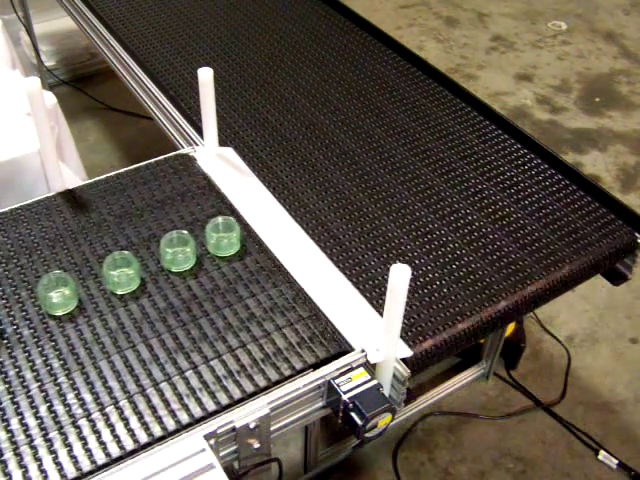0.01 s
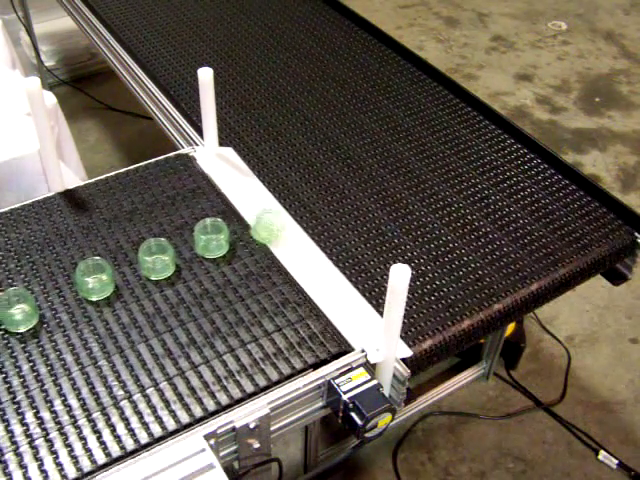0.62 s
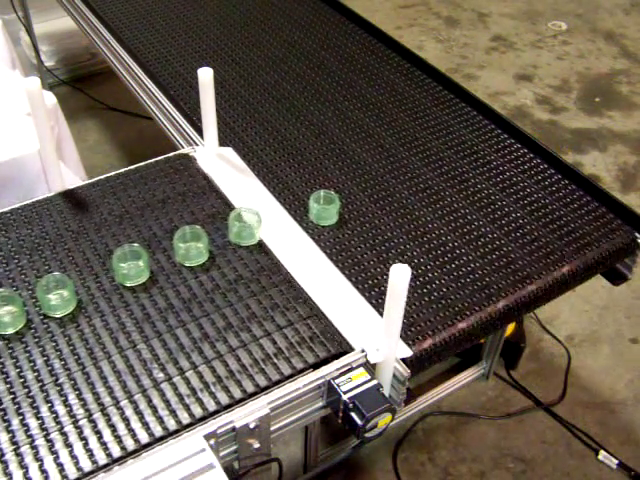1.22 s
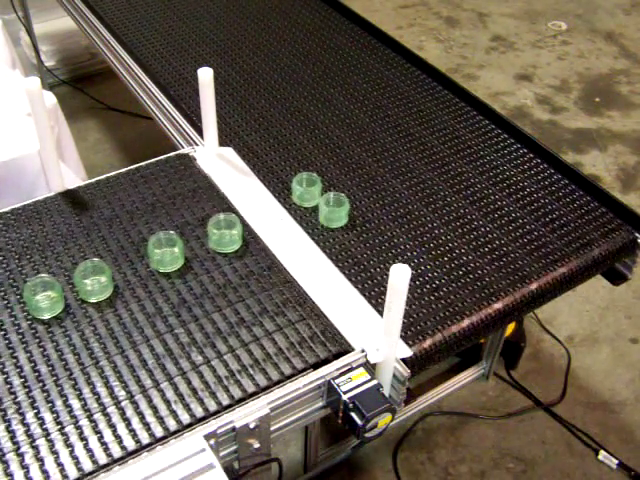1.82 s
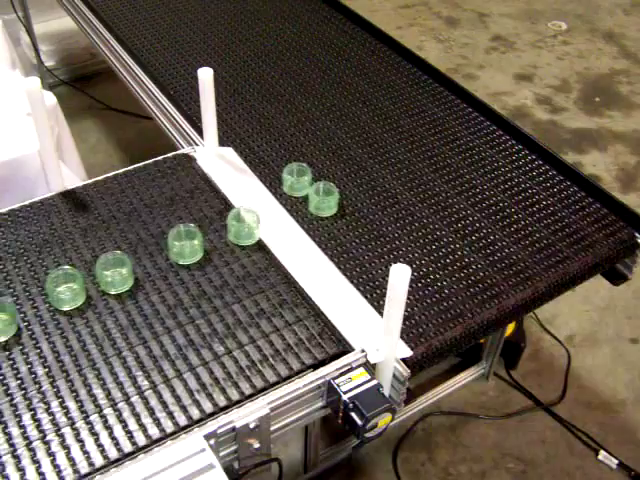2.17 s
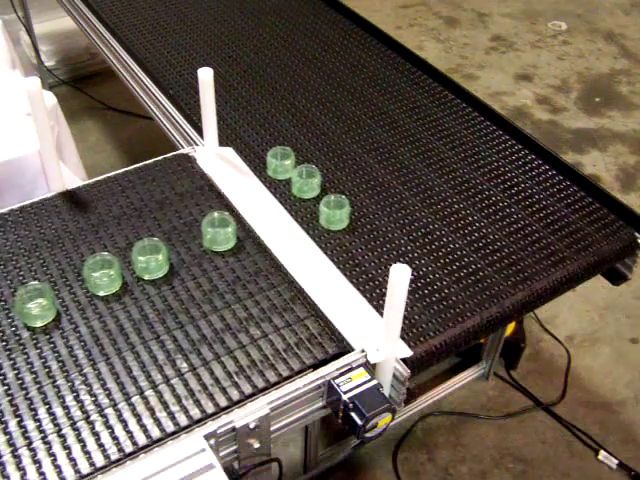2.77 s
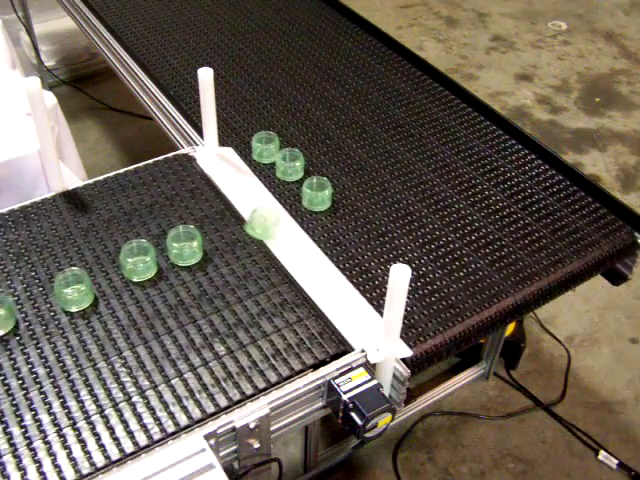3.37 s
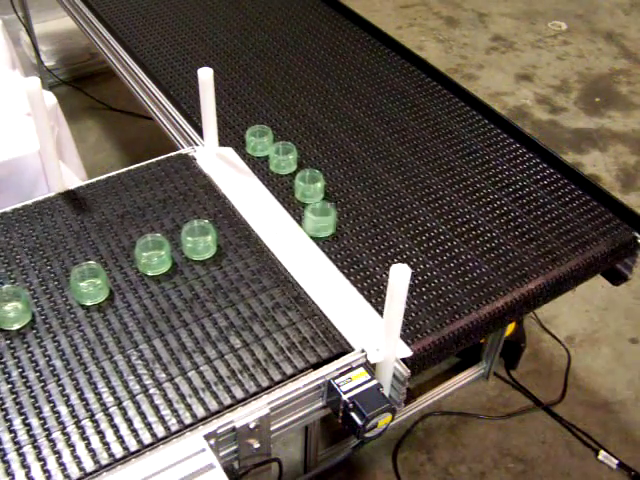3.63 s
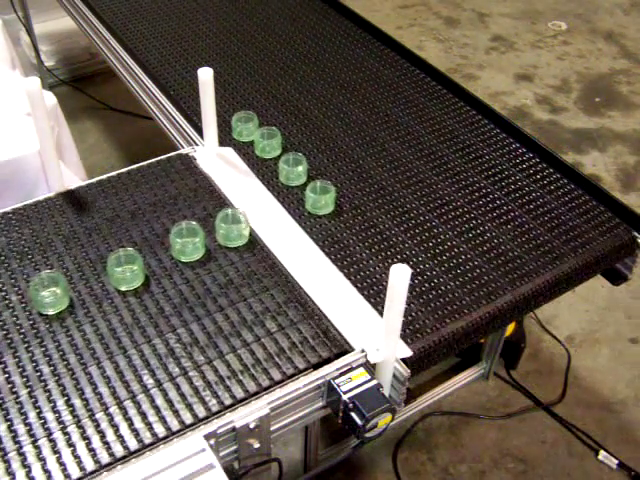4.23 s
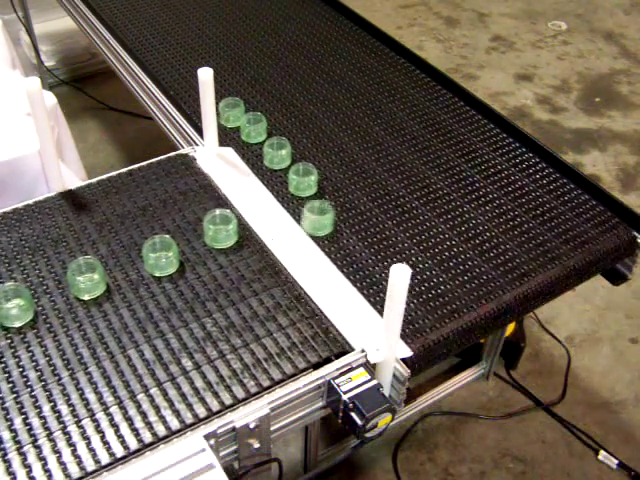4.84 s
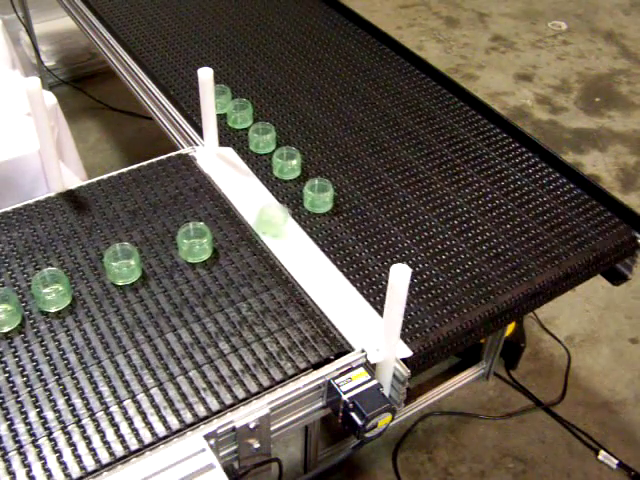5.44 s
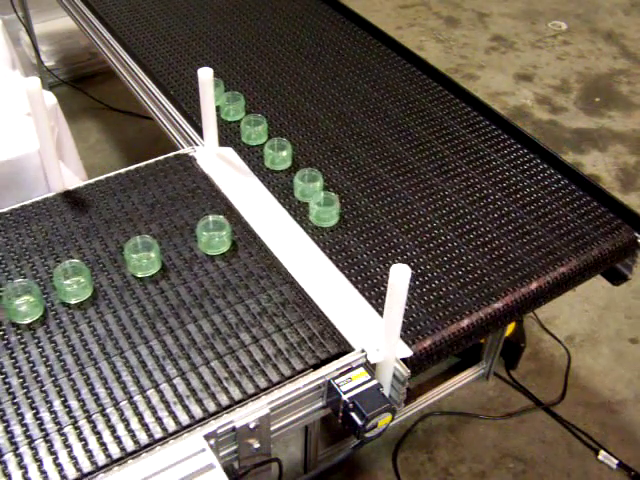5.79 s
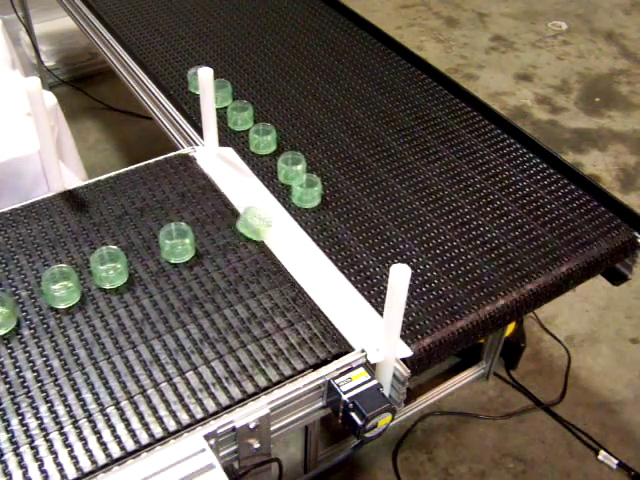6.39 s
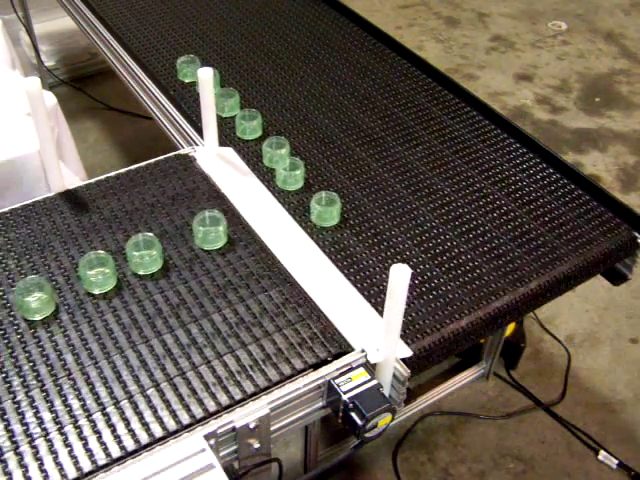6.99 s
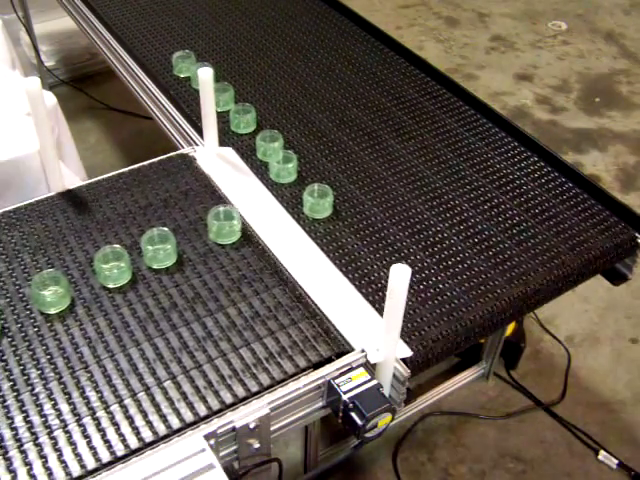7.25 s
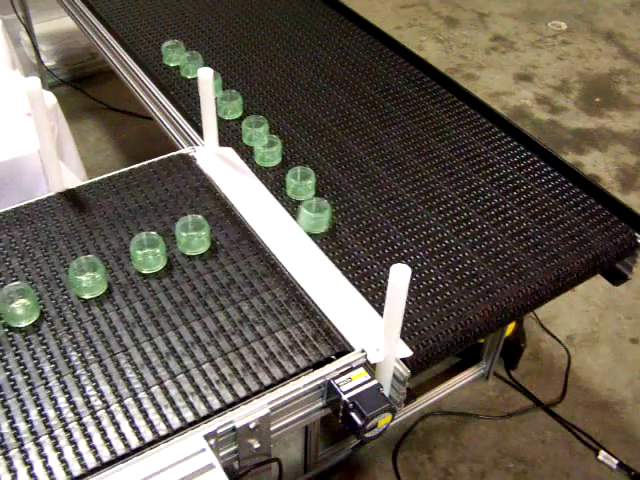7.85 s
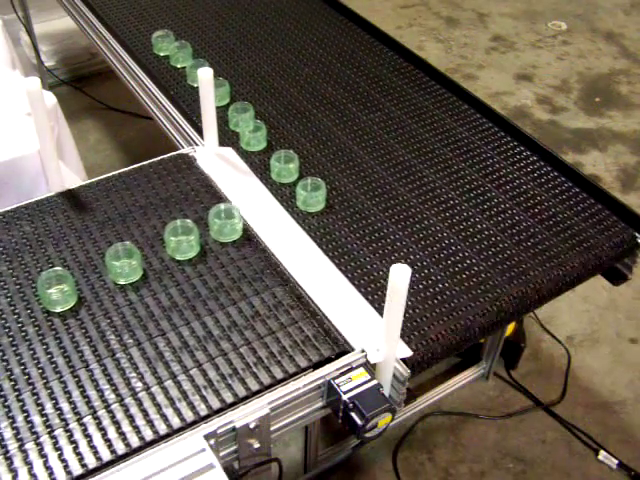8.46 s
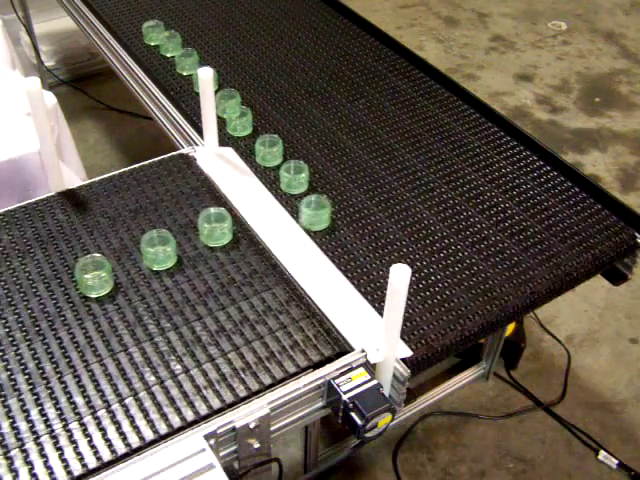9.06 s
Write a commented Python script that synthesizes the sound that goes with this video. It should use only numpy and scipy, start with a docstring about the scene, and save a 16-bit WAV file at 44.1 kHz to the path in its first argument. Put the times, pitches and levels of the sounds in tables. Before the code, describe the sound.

Two conveyor belts run from start to finish in a hard-floored workshop, making an even, hissing rattle of plastic links over a low rumble and a thin, steady gear whine. Close to the microphone, small plastic jars cross a transfer plate one at a time. Each tips, slaps flat, ticks over the edge and drops on the next belt: a cluster of sharp, bright clicks lasting about a third of a second, with soft hollow tocks underneath and a faint room tail. The clusters begin at about 0.5, 1.3, 2.3, 3.3, 4.5, 5.3, 6.3, 7.5 and 8.7 seconds. Jars also wobble or knock together, clearly near 1.1 and 5.8 seconds, and scuff briefly around 1, 5 and 9 seconds. The low motor drone swells and eases in the second half. Faint dull bumps come from the machine near 2.5, 5.5 and 7.2 seconds.

```python
"""Jars on workshop conveyors

One microphone, close to the transfer plate between two running belts. Behind, the drives hum and whine
and plastic links rattle over the sprockets. Up front, small plastic jars tip onto the plate one by one,
rock across and drop on the next belt, where some knock together. The hard-floored room answers each
click with a faint tail."""
import sys
import numpy as np
from scipy import signal
from scipy.fft import rfft, irfft, next_fast_len
from scipy.io import wavfile
from scipy.ndimage import uniform_filter1d

SR = 44100
rng = np.random.default_rng(int(sys.argv[2]) if len(sys.argv) > 2 else 0)


def unload_audio(sound):
    """Save the sound as a 16-bit wav file, at the path given as the first command line argument."""
    columns = np.transpose(np.atleast_2d(sound))
    # keep every value between -1 and 1, then stretch to whole-number steps
    steps = np.round(np.clip(columns, -1, 1) * 32767)
    wavfile.write(sys.argv[1], SR, steps.astype(np.int16))


N = 402191
TIME = np.arange(N) / SR


def undb(db):
    """Decibels to gain."""
    return 10 ** (np.asarray(db) / 20)


def unit(x):
    """Scale to an rms of one."""
    return x / np.sqrt(np.mean(x ** 2) + 1e-18)


def drift(per_s):
    """Random levels, drawn per_s times a second and smoothed twice; rms of one."""
    hold = max(int(SR / per_s), 1)
    steps = rng.standard_normal(N)[np.arange(N) // hold]
    return unit(uniform_filter1d(uniform_filter1d(steps, hold), hold))


def tone(hz, wander):
    """A sine of unit rms whose pitch wanders by a share."""
    pitch_hz = hz * (1 + wander * drift(12))
    return unit(np.sin(2 * np.pi * np.cumsum(pitch_hz) / SR))


def colour(x, points):
    """Shape a sound by (Hz, dB) points, falling 12 dB an octave beyond both ends."""
    hz, db = np.transpose(points)
    size = next_fast_len(len(x))
    f = np.maximum(np.fft.rfftfreq(size, 1 / SR), 1)
    gain = undb(np.interp(np.log(f), np.log(hz), db))
    skirts = np.minimum(f / hz[0], 1) ** 2 * np.minimum(hz[-1] / f, 1) ** 2
    return irfft(rfft(x, size) * gain * skirts, size)[:len(x)]


def noise(samples, points):
    """Noise of unit rms, shaped by (Hz, dB) points."""
    return unit(colour(rng.standard_normal(samples), points))


def add(out, s, sound):
    """Mix a sound in at s seconds."""
    i = max(int(s * SR), 0)
    out[i:i + len(sound)] += sound[:max(N - i, 0)]


def ring(modes, gains, t, detune, head_s, scatter_db=2.5):
    """Damped modes, unit rms over the first head_s; each contact point shifts their levels and pitch."""
    hz, db, t60 = np.transpose(modes)
    scatter, bend, side = rng.standard_normal((3, len(hz)))
    weights = np.sign(side) * gains * undb(db + scatter_db * scatter)
    sines = np.sin(2 * np.pi * np.outer(hz * (1 + detune * bend), t))
    decays = np.exp(-np.log(1000) * np.outer(1 / t60, t))
    sound = weights @ (sines * decays)
    return sound / np.sqrt(np.mean(sound[:int(head_s * SR)] ** 2))


def workshop(x, t60_s=0.8, wet_db=-10, build_s=0.00048):
    """Floor and walls add a diffuse, duller tail; every spot on the belts has its own echo pattern."""
    t = np.arange(SR // 2) / SR
    response = noise(len(t), [(200, -2.5), (3500, -1), (5000, -5), (6200, -6.5), (9000, -11)])
    response *= np.exp(-np.log(1000) * t / t60_s) * (1 - np.exp(-t / build_s))
    response *= undb(wet_db) / np.sqrt(np.sum(response ** 2))
    response[0] = 1  # the direct path to the microphone
    return signal.fftconvolve(x, response)


# A panel buzzing for a moment. Each row: time in seconds, level in dB.
PANEL_BUZZ = [(0, -58), (8.1, -64), (8.35, -50), (8.8, -48), (9.05, -61)]
# Dull bumps in the frame. Each row: start in seconds, level in dB.
FRAME_BUMPS = [(2.5, -39), (5.5, -42), (7.15, -44)]


def frame(hum_hz=208, hum_db=-50, throb_db=4, throbs_per_s=10, buzz_hz=360, bump_s=0.041):
    """Far back in the sound, the conveyor frame throbs, buzzes briefly and takes a few dull bumps."""
    hum = unit(tone(hum_hz, wander=0.0155) * undb(throb_db * drift(throbs_per_s)))
    buzz = tone(buzz_hz, wander=0.0019) * undb(np.interp(TIME, *np.transpose(PANEL_BUZZ)))
    out = hum * undb(hum_db) + buzz
    t = np.arange(SR) / SR
    swell = t / bump_s * np.exp(1 - t / bump_s)
    for s, db in FRAME_BUMPS:
        thud = noise(len(t), [(30, -13), (50, 5), (90, -19)])
        add(out, s, thud * undb(db) * swell)
    return out


# The drives' drone as the load changes. Each row: time in seconds, relative level in dB.
LOAD_DRONE = [(0, -65), (1.4, -47), (2.2, -60), (3, -48), (4.8, -42), (5.15, -51), (5.5, -38), (6.1, -48.5),
              (6.7, -36.5), (7.2, -47.5), (8.5, -37.5), (9.1, -45.5)]
# Motor and gear tones. Each row: pitch in Hz, level in dB, waver in dB, wander as a share of the pitch.
GEAR_TONES = [(120, -59, 3, .004), (717, -57, 3, .002), (1195.4, -48, 1.5, .0004), (1440.3, -52, 2, .0002),
              (3480, -49, 2, .0001), (3600.6, -46.7, 2, .0001)]


def drives(first_hz=86.4, sag_hz_per_s=0.5, second_hz=81.2, second_db=-4, drone_db=-1):
    """Two drives, one slowing, beat in a drone that swells with the load; motors and gears whine."""
    first = tone(first_hz - sag_hz_per_s * TIME, wander=0.004)
    second = undb(second_db) * tone(second_hz, wander=0.0047)
    load_db = np.interp(TIME, *np.transpose(LOAD_DRONE))
    out = unit(first + second) * undb(load_db + drone_db)
    for hz, db, waver_db, wander in GEAR_TONES:
        out += undb(db) * unit(tone(hz, wander) * undb(waver_db * drift(5.5)))
    return out


# The rattle of the plastic links. Each row: frequency in Hz, relative spectral level in dB.
LINK_SPECTRUM = [(600, -27.5), (830, -32), (930, -4.5), (1300, -2.5), (1520, -0.5), (2200, -2.5), (3000, 0),
                 (3500, 2), (4000, -1.5), (4900, -5), (5800, -15), (7300, -21.5), (8000, -34.5),
                 (8750, -31), (9500, -45.5)]
# The rumble under the belts. Each row: frequency in Hz, relative spectral level in dB.
RUMBLE_SPECTRUM = [(20, -12), (35, -0.5), (60, 0.5), (95, 1.5), (125, 1), (175, 1), (235, -2), (310, -7),
                   (400, -8), (600, -7), (670, -7.5), (750, -3.5), (900, -5.5), (1300, -24.5)]


def belts(rattle_db=-29, flutter_db=0.53, rumble_db=-38.5, throb_db=1,
          ticks_per_s=2500, tick_spread_db=3, tick_share_db=-5):
    """Countless hinge ticks reach the microphone as an even hiss; the frames rumble below."""
    ticks = (rng.random(N) < ticks_per_s / SR) * rng.choice([-1, 1], N)
    ticks = ticks * undb(tick_spread_db * np.minimum(rng.exponential(size=N), 5))
    wash = rng.standard_normal(N)  # ticks smeared by the room
    links = unit(colour(undb(tick_share_db) * unit(ticks) + wash, LINK_SPECTRUM))
    rattle = links * undb(rattle_db + flutter_db * drift(25))
    rumble = noise(N, RUMBLE_SPECTRUM) * undb(rumble_db + throb_db * drift(8))
    return rattle + rumble


# Jars scuffing on plate and belt. Each row: start and length in seconds, level in dB, centre in Hz.
JAR_SCUFFS = [(0.789, 0.19, -31.5, 4550), (1.027, 0.095, -25, 3740), (1.591, 0.13, -31.5, 4400),
              (2.187, 0.046, -30, 3300), (2.558, 0.15, -38, 4400), (4.696, .06, -29, 2800),
              (5.018, 0.088, -31, 3420), (9.012, 0.25, -31, 3900)]


def scuffs(slips_per_s=3000, skirt_db=-14):
    """Close by, a sliding jar catches and slips in a quick run of tiny ticks."""
    out, t = np.zeros(N), np.arange(SR // 4) / SR
    for s, length_s, db, hz in JAR_SCUFFS:
        slips = (rng.random(len(t)) < slips_per_s / SR) * rng.standard_normal(len(t))
        band = [(hz * 0.49, skirt_db), (hz, 0), (hz * 1.26, skirt_db), (hz * 2.1, -45)]
        swell = np.sin(np.pi * np.minimum(t / length_s, 1))
        add(out, s, unit(colour(slips, band)) * undb(db) * swell)
    return out


# The transfer plate's modes. Each row: pitch in Hz, relative level in dB, seconds to fade by 60 dB.
PLATE_MODES = [(418, -9, 0.085), (477, -9.5, 0.11), (589, -2.5, 0.068), (726, -5.5, .07), (925, -1.5, 0.14),
               (997, -3, 0.089), (1124, -0.5, 0.05), (1470, -4.5, 0.022), (1760, -1.5, 0.028),
               (2700, 2, 0.016), (3670, -5, 0.022)]


def plate(landings, gain_db=2.04, thud_db=-4, thud_s=0.009, press_s=0.0005):
    """The plate gives a hollow tock under each jar: its modes over a short, broad thud."""
    out, t = np.zeros(N), np.arange(SR // 5) / SR
    press = 1 - np.exp(-t / press_s)  # the weight comes on softly
    for s, db in landings:
        modes = ring(PLATE_MODES, 1, t, detune=0.0045, head_s=0.01)
        thud = noise(len(t), [(250, -14), (500, -4.5), (1000, -2.5), (2200, -1), (4500, -20.5)])
        tock = modes + undb(thud_db) * thud * np.exp(-t / thud_s)
        add(out, s, workshop(undb(db + gain_db) * tock * press))
    return out


# A jar's wall modes. Each row: pitch in Hz, relative level in dB, seconds to fade by 60 dB.
JAR_MODES = [(1440, -5, 0.018), (1968, -0.5, 0.02), (2136, -10, 0.02), (2468, -3.5, 0.023),
             (2880, -7, 0.021), (3190, -2.5, 0.0094), (3617, -4, 0.016), (4176, -1, 0.01),
             (4624, -1.5, 0.014), (5044, 0.5, .011), (5554, 0, 0.01), (6220, -3.5, 0.0069),
             (6430, -2, 0.0082), (7600, -12.5, 0.0099), (8300, -24, 0.0058)]


def jars(blows, gain_db=1, contact_s=0.00022, crack_db=-4, crack_s=0.0012, echo_s=0.0034, echo_db=-11):
    """Right at the microphone, each blow cracks and briefly rings a jar: hard rim high, flat base low."""
    out, t = np.zeros(N), np.arange(SR // 25) / SR
    mode_hz = np.array(JAR_MODES)[:, 0]
    attack = 1 - np.exp(-t / contact_s)
    for s, db, hz, octaves in blows:
        gains = 1 / (1 + (np.log2(mode_hz / hz) / octaves) ** 2)
        modes = ring(JAR_MODES, gains, t, detune=0.024, head_s=0.005)
        crack = noise(len(t), [(hz / 3, -4), (hz * 1.1, 0), (hz * 2, -18), (hz * 3.2, -44)])
        crack *= undb(crack_db) * np.exp(-t / crack_s)
        click = undb(db + gain_db) * (modes + crack) * attack
        add(out, s, workshop(click))
        add(out, s + echo_s * rng.uniform(0.8, 1.3), undb(echo_db) * click)  # reflected off the belt
    return out


def bounce(s, db, hz, octaves, gap_s, rebound_db):
    """A blow and its weaker rebound; the gap is never quite the same."""
    rebound_s = s + gap_s * rng.uniform(0.75, 1.25)
    return [(s, db, hz, octaves), (rebound_s, db + rebound_db, hz, octaves)]


# A rim tips onto the plate. Each row: start in seconds, jar and plate levels in relative dB.
RIM_TIPS = [(.484, -17, -30), (1.268, -17, -31), (2.2591, -18, -28.5), (3.2531, -16, -29),
            (4.4753, -19, -31.5), (5.2597, -18.5, -29), (6.293, -32, -27), (7.478, -29, -29),
            (8.675, -26, -34.5)]
# The base slaps flat. Each row: start in seconds, jar level in relative dB, ring centre in Hz,
# plate level in relative dB.
BASE_SLAPS = [(0.5754, -14, 3260, -32.5), (1.3559, -17.5, 2660, -34), (2.3463, -14, 2740, -38),
              (3.3485, -20.5, 3175, -31.5), (4.554, -13, 2630, -33.5), (5.354, -17, 3370, -29.5),
              (6.4348, -12.5, 3650, -29), (7.5795, -15, 2590, -33.5), (8.7708, -17.5, 2200, -32.5)]
# The jar ticks over the far lip. Each row: start in seconds, jar level in relative dB.
LIP_TICKS = [(.721, -22), (1.4982, -19.5), (2.486, -20), (3.4928, -19.5), (4.7008, -22), (5.5025, -19.5),
             (6.574, -20), (7.7208, -18.5), (8.91, -19.5)]
# It drops on the next belt. Each row: start in seconds, jar level in relative dB, ring centre in Hz.
BELT_DROPS = [(.8083, -15, 4350), (1.577, -14.5, 4240), (2.564, -14, 3800), (3.5743, -16, 4300),
              (4.785, -16.5, 3600), (5.5883, -13.5, 5070), (6.6604, -14, 3760), (7.806, -15, 3930),
              (8.994, -12, 3900)]
# Jars wobble or knock together. Each row: start in seconds, jar level in relative dB, ring centre in Hz.
JAR_KNOCKS = [(1.1412, -18.5, 2600), (1.152, -17, 2680), (1.618, -20, 4070), (2.2939, -16.5, 3830),
              (2.6024, -19, 3460), (3.3755, -20, 2920), (3.6209, -18, 3600), (4.9703, -23.5, 3100),
              (5.3635, -16.5, 3150), (5.785, -14.5, 4200), (6.2322, -28.5, 4200), (6.356, -23.5, 3920)]


def crossings(tip_hz=3400, lip_hz=3700, lip_weight_db=-36.5, base_hz=2000, base_db=-12):
    """Each jar tips, slaps, ticks and drops past the microphone in about a third of a second."""
    # On the jars. Each row: start in seconds, relative dB, ring centre in Hz, its spread in octaves.
    blows = [(s, db, hz, 0.55) for s, db, hz in JAR_KNOCKS]
    landings = []  # On the plate. Each row: start in seconds, relative dB.
    for s, db, plate_db in RIM_TIPS:  # one hop on the rim
        blows += bounce(s, db, tip_hz, octaves=0.5, gap_s=0.031, rebound_db=-8.5)
        landings.append((s, plate_db))
    for s, db, hz, plate_db in BASE_SLAPS:  # the base chatters
        blows += bounce(s, db, hz, octaves=0.78, gap_s=0.011, rebound_db=-13.5)
        landings.append((s, plate_db))
    for s, db in LIP_TICKS:  # the base follows the rim, with little weight left on the plate
        blows += bounce(s, db, lip_hz, octaves=0.5, gap_s=0.005, rebound_db=-1)
        landings.append((s, lip_weight_db))
    for s, db, hz in BELT_DROPS:  # the flat base sounds under each drop
        blows += [(s, db, hz, 0.38), (s, db + base_db, base_hz, 0.34)]
    return blows, landings


def scene():
    """Jars and plate up front, the running machines behind, in mono."""
    blows, landings = crossings()
    return (jars(blows) + plate(landings) + scuffs() + belts() + drives() + frame())[None]


def record(dry):
    """The recorder rounds the highest peaks and cuts the top above 9.7 kHz."""
    lowpass = signal.ellip(8, 0.2, 80, 9700, fs=SR, output="sos")
    return signal.sosfilt(lowpass, np.tanh(dry))


dry = scene()
out = record(dry)
unload_audio(out)
```